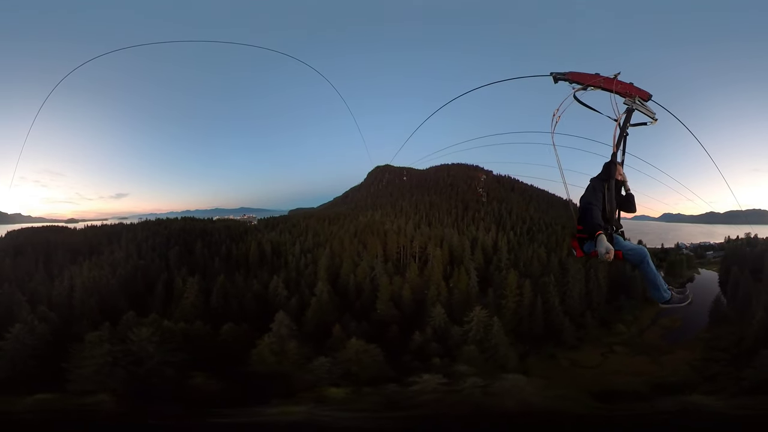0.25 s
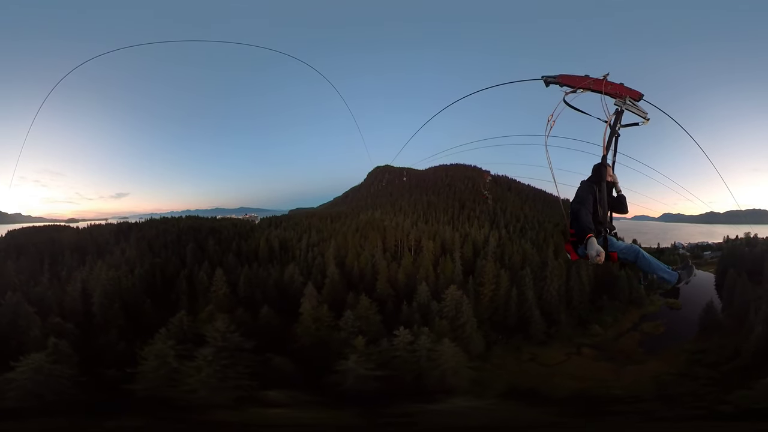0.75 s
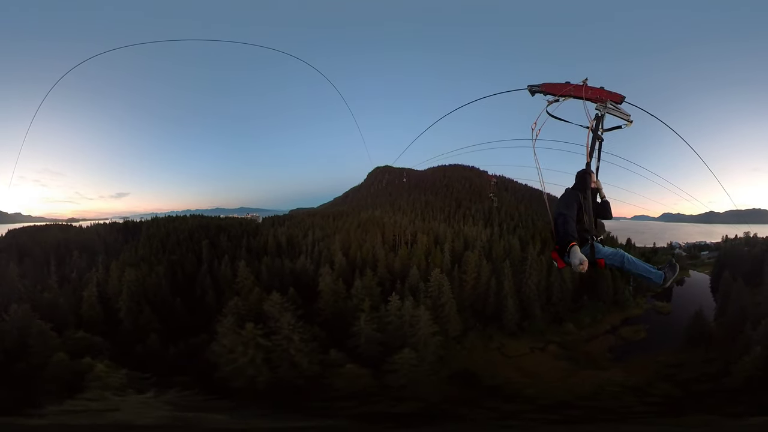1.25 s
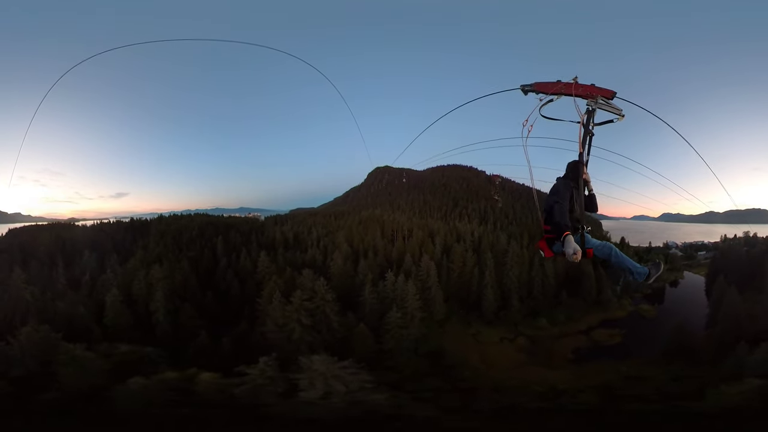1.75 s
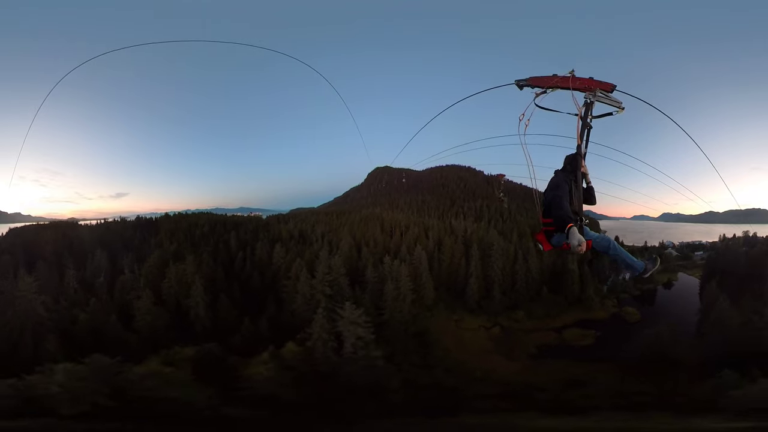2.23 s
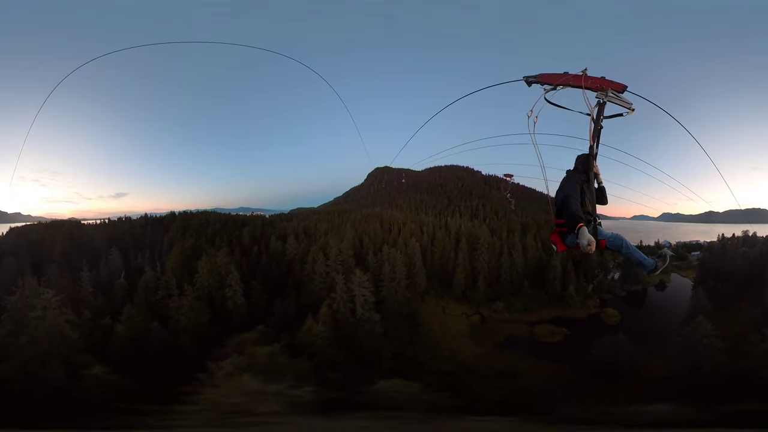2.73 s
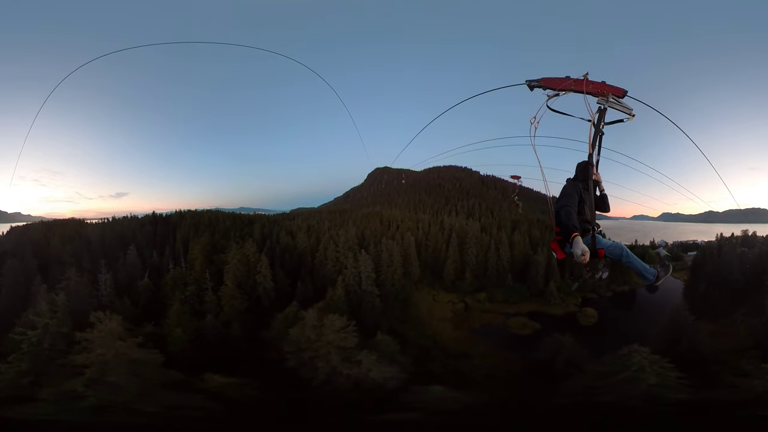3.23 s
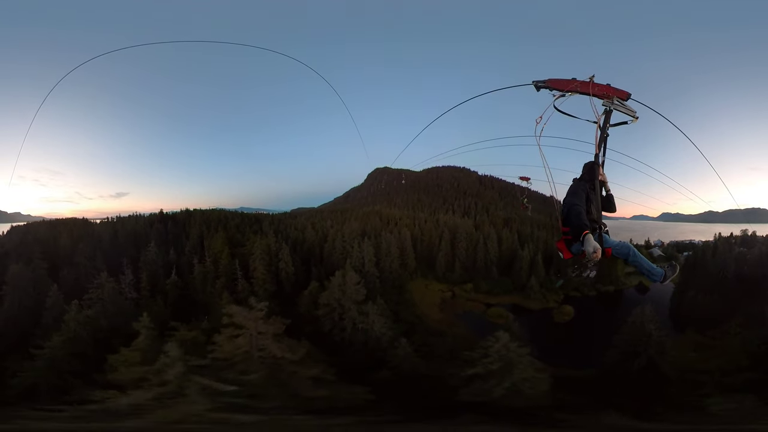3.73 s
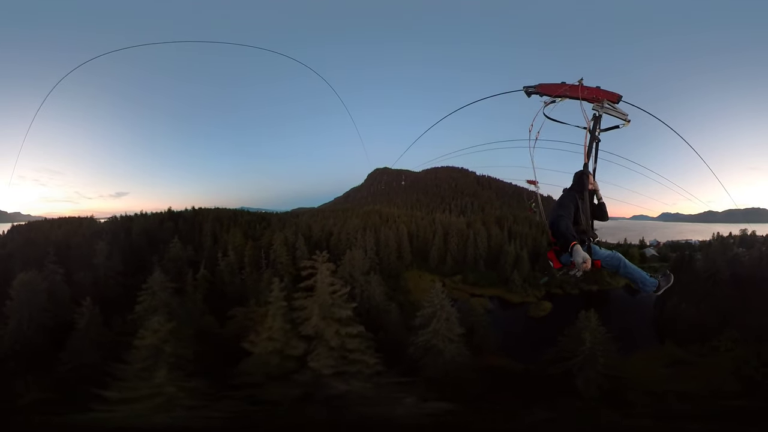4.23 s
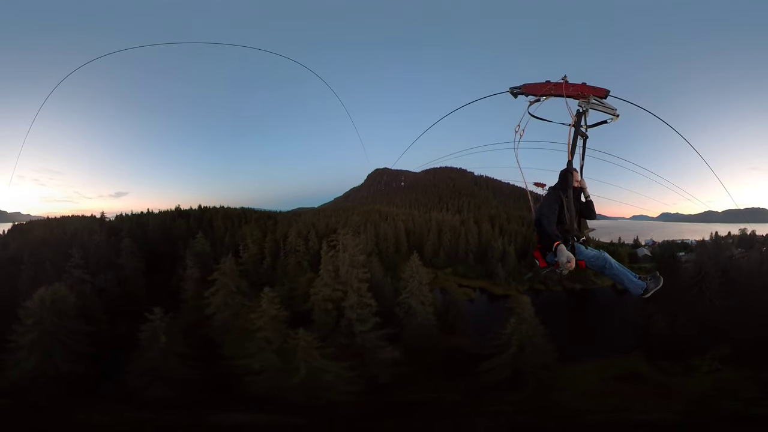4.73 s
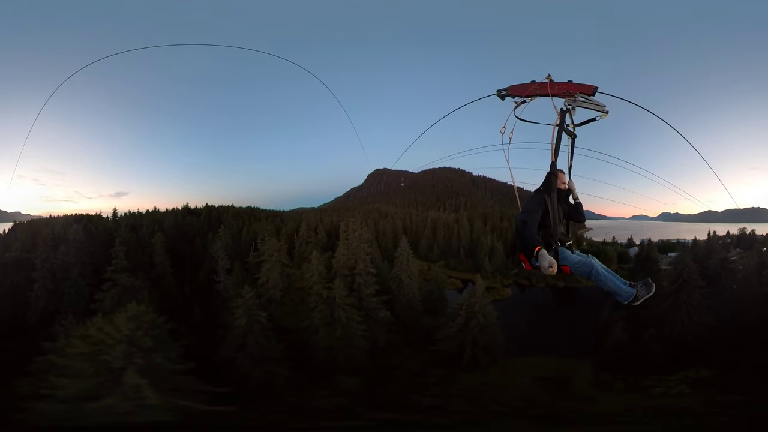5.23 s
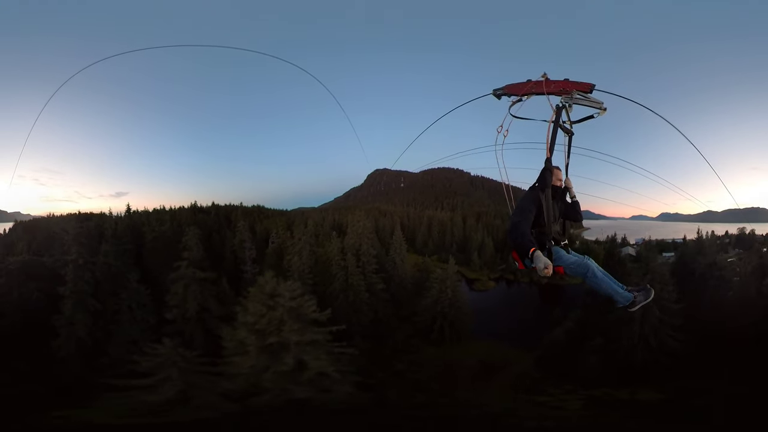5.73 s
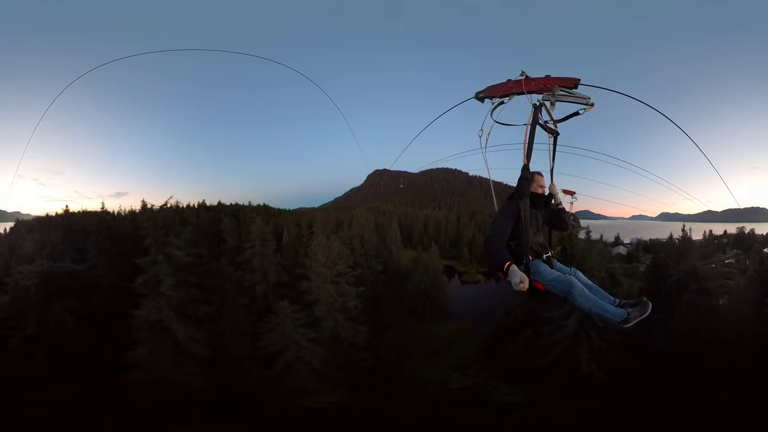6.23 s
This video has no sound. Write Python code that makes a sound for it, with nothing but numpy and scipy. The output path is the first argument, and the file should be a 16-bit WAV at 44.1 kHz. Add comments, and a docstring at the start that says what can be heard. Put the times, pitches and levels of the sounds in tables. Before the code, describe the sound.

Heavy, low wind buffets the microphone on a fast cable ride, with a wavering hollow hum and a faint pulley whine overhead.

```python
"""Over a forest, on a zip line, heard from a camera held out on a pole.
Vortices shed by the pole sing a wavering aeolian tone; shaped noise buffets, rushes and hisses at the microphone.
Gusts roar, thump and whistle as gliding bands of noise; slaps and jets of air strike the port.
Overhead the pulleys whine in three partials, sinking as the ride slows, and noise rings the trolley frame;
a wheel squeals thinly and the rigging ticks."""
import sys
import numpy as np
from scipy import signal
from scipy.fft import rfft, irfft
from scipy.io import wavfile
from scipy.ndimage import uniform_filter1d

SR = 44100
rng = np.random.default_rng(int(sys.argv[2]) if len(sys.argv) > 2 else 0)


def persist_wave(psi):
    """Save psi, clipped to +-1, as 16-bit WAV."""
    counts = np.round(np.clip(psi, -1, 1) * 32767).astype(np.int16)
    wavfile.write(sys.argv[1], SR, np.atleast_2d(counts).T)


N = 285768
TIME = np.arange(N) / SR  # s
EDGE_HZ = 7300  # upper band limit
WHINE_HZ, SAG_HZ_PER_S, SAG_HZ_PER_S2 = 1195, 2.3, 1.62  # start pitch and its ever faster fall

# Relative levels are trimmed where used. Times are event centres unless marked as start.
# vortex shedding rate of the pole, set by airspeed: (time [s], mean pitch [Hz])
POLE_PITCH = [(0, 390.4), (.2, 392), (.29, 402.7), (.4, 373.3), (.5, 396), (.68, 384), (.83, 389.2),
              (.96, 373.4), (1.3, 368.4), (1.42, 373), (1.6, 365.8), (2.05, 359.8), (2.23, 366.3),
              (2.5, 357.3), (2.88, 349.4), (2.96, 358.8), (3.1, 349.7), (3.17, 366), (3.25, 351.8),
              (3.38, 373.7), (3.48, 352), (3.73, 375.3), (4.1, 361), (4.21, 393.8), (4.33, 370),
              (4.58, 388.8), (4.75, 382.7), (4.87, 391.4), (4.97, 383.3), (5.22, 399.2), (5.4, 387.7),
              (5.55, 382), (5.82, 356.5), (6.13, 358.3), (6.23, 397.5), (6.31, 413.8), (6.39, 388),
              (6.48, 415)]
# regularity of the shedding: (time [s], relative tone level [dB])
POLE_LEVEL = [(0, -28), (.28, -25.5), (.4, -25), (.5, -27), (.62, -27), (.95, -23), (1.3, -25), (1.6, -27),
              (1.9, -23.5), (2.25, -22), (2.62, -21), (2.9, -25), (3.5, -24), (3.87, -24), (4.1, -22),
              (4.4, -27.5), (4.57, -27), (4.7, -26.5), (5, -25), (5.23, -20.5), (5.55, -22.5),
              (5.68, -36.5), (6.18, -29.5), (6.3, -16.5), (6.42, -30.5)]
# shedding locks in, tone flares: (time [s], length [s], rise [dB])
POLE_FLARES = [(.29, 0.027, 5.5), (.507, 0.025, 15), (3.872, .04, 6), (4.575, .05, 7.5), (5.756, .025, 14)]
# shedding breaks down, tone drops out: (time [s], length [s], depth [dB])
POLE_BREAKS = [(.18, 0.053, 19), (.57, 0.05, 22.5), (.66, 0.049, 6.5), (.74, 0.068, 12), (.87, 0.043, 20),
               (1.03, 0.056, 2.5), (1.51, 0.051, 4), (1.93, 0.13, 6), (2.16, 0.098, 7), (2.44, 0.043, 6),
               (2.77, 0.18, 14.5), (3.12, 0.072, 9), (3.49, 0.036, 7), (3.9, 0.037, 12), (4.27, 0.11, 19),
               (4.355, 0.04, 20), (4.61, .04, 15), (4.92, 0.053, 10), (5.37, 0.14, 10), (5.46, .04, 18),
               (6.0, 0.064, 13), (6.24, .03, 11), (6.37, .04, 10)]
# hollow ring of the pole, stirred by airflow: (time [s], level [dB])
POLE_HOLLOW = [(0, -26), (.68, -37.5), (1.6, -27), (2.85, -34.5), (3.7, -32), (4.2, -29.5), (4.29, -35),
               (4.6, -31), (5.3, -32.5), (6, -34.5), (6.4, -30)]
# smooth air, less buffeting, stronger pole tone: (time [s], length [s], depth [dB])
CALMS = [(0.926, 0.1, 9), (1.23, 0.084, 4), (1.655, 0.062, 7), (1.83, .07, 12), (2.2, 0.13, 6.5),
         (3.195, 0.031, 23), (3.778, 0.097, 17), (4.308, 0.14, 17), (5.35, 0.12, 7.5), (5.52, 0.086, 0.5),
         (6.311, .09, 4)]
# buffeting at the microphone: (time [s], relative level [dB])
BUFFET = [(0, -25.5), (.5, -28.5), (.95, -26), (1.25, -24.5), (1.75, -26.5), (2.45, -29.5), (2.9, -25),
          (3.65, -23.5), (3.95, -25), (4.45, -22.5), (5.3, -25), (5.8, -22), (6.48, -23)]
# buffeting spectrum: (frequency [Hz], relative density [dB])
BUFFET_COLOUR = [(10, -40), (25, -23.5), (38, -6.5), (52, -0.5), (90, -0.5), (130, -1.5), (200, -3.5),
                 (300, -10.5), (420, -13.5), (700, -27.5), (1500, -61)]
# airstream round the housing: (time [s], relative level [dB])
RUSH = [(0, -29), (.42, -28), (.8, -35.5), (1.08, -34.5), (1.28, -40), (1.42, -38.5), (1.75, -39.5),
        (2.82, -35), (3.05, -40), (3.55, -41), (3.86, -32.5), (4.02, -37.5), (4.19, -28.5), (4.235, -25.5),
        (4.258, -43), (4.3, -33.5), (4.35, -39), (4.4, -41), (4.7, -41.5), (5.3, -44.5), (5.42, -41.5),
        (6.12, -42.5), (6.48, -47.5)]
# rush spectrum: (frequency [Hz], relative density [dB])
RUSH_COLOUR = [(100, -14.5), (280, 8), (480, 1.5), (650, -1.5), (900, -7.5), (1200, -15.5), (1600, -24.5),
               (2200, -37), (3500, -47)]
# flurries that ruffle the rush: (time [s], length [s], level change [dB])
FLURRIES = [(.41, 0.024, 3.5), (1.028, .025, 5.5), (2.82, .06, 3.5), (3.52, .05, 3), (4.17, .035, 4.5),
            (4.38, 0.027, 8), (4.43, 0.054, 2.5), (4.645, .06, 5.5), (4.788, 0.031, 4.5), (4.86, .03, 0),
            (4.97, .08, 3.5), (5.235, 0.027, -0.5), (5.43, 0.098, 1), (5.6, 0.057, 1), (5.78, 0.023, 8.5),
            (6.09, 0.037, 9.5), (6.15, 0.038, 9), (6.385, 0.049, 1)]
# fine turbulence at the port: (time [s], relative level [dB])
HISS = [(0, -62), (.58, -63), (.835, -64), (1.15, -66.5), (1.8, -63), (2.8, -61), (2.98, -65.5),
        (3.2, -62.5), (3.95, -63), (4.15, -60.5), (4.25, -66.5), (5.27, -67.5), (5.4, -63), (5.56, -65.5),
        (5.72, -63), (5.87, -67), (6.03, -60), (6.22, -64.5), (6.48, -69)]
# hiss spectrum: (frequency [Hz], relative density [dB])
HISS_COLOUR = [(500, -11.5), (1200, 11.5), (1800, 12), (2300, 4.5), (3000, -0.5), (4000, -4), (5050, -6.5),
               (5600, -14), (6500, -26), (7400, -31)]
# hollows of the housing that colour the hiss: (centre [Hz], width [Hz], lift [dB])
HOUSING_HOLLOWS = [(2600, 130, 0), (3540, 140, 2), (4140, 170, 2.5), (4830, 170, 2.5)]
# roar over the housing, sliding as the camera swings: (time [s], centre [Hz], relative level [dB])
ROAR = [(0, 930, -38.5), (.3, 980, -38), (.55, 1100, -38.5), (.65, 1101, -42), (.72, 1253, -51.5),
        (.82, 1300, -48.5), (.87, 1320, -41.5), (.94, 1238, -40.5), (1.03, 1230, -43.5),
        (1.09, 1020, -43.5), (1.15, 800, -40), (1.24, 801.4, -61.5), (3.55, 1350, -63.5),
        (3.76, 1253, -43.5), (3.88, 1200, -44), (4.0, 1223, -37), (4.12, 1250, -38), (4.18, 1080, -38.5),
        (4.225, 920, -42), (4.25, 1350, -64), (4.28, 1430, -44.5), (4.36, 1180, -47), (4.5, 1204, -71)]
# large eddies striking the microphone: (time [s], length [s], level [dB], centre [Hz])
THUMPS = [(0.067, 0.14, -30, 200), (.22, .14, -27, 190), (.615, 0.064, -22, 109.2), (0.672, 0.061, -18, 72),
          (0.759, 0.1, -22, 87.3), (1.12, 0.11, -22, 179.3), (1.391, 0.046, -21.5, 118.7),
          (1.77, .05, -27, 168.3), (1.86, .06, -23, 100.8), (2.353, 0.054, -26.5, 70),
          (2.792, 0.12, -23, 200), (2.88, 0.17, -21.5, 60), (3.058, 0.069, -23.5, 102),
          (3.362, 0.0474, -31, 111.1), (4.171, 0.053, -19, 223.1), (4.648, .05, -22.5, 127),
          (5.06, 0.075, -25.5, 90), (5.441, 0.072, -24, 110), (6.0, .1, -23.5, 190.1),
          (6.149, 0.13, -25, 90)]
# gusts on the housing edges:
# (time [s], length [s], relative level [dB], first pitch [Hz], last pitch [Hz], width [Hz])
WHISTLES = [(0.068, 0.19, -39, 1183, 915, 45), (0.168, 0.17, -38, 714, 662, 79),
            (0.334, 0.16, -39.5, 990, 1168, 70), (0.421, 0.18, -46, 1170, 1036, 60),
            (0.476, 0.31, -50.5, 1310, 1260, 120.6), (.55, 0.17, -40, 1189, 991, 90),
            (1.476, 0.16, -38.5, 790, 742, 180), (1.799, 0.13, -49, 1580, 1627, 69.7),
            (2.218, 0.17, -49, 1803, 1748, 45), (2.309, 0.08, -48, 1750, 1906, 44.6),
            (2.922, 0.12, -41.5, 1250, 1297, 90), (3.091, 0.036, -51, 1388, 1360, 50.5),
            (3.187, 0.084, -41.5, 1294, 1354, 44.8), (3.435, .07, -47, 1295, 1343, 69.8),
            (3.837, 0.16, -39, 1313, 1106, 70), (4.173, 0.079, -35, 1066, 1020, 45),
            (4.29, 0.056, -49, 1490, 1385, 68.5)]
# tight vortices crossing the port, sudden pressure dips: (time [s], peak [dB], centre [Hz])
SLAPS = [(2.082, -7.5, 129), (4.239, -6.5, 65), (4.628, -10, 132), (5.597, -10, 130), (5.776, -17.5, 75),
         (5.8, -12, 64.1), (6.254, -14, 168), (6.414, -9.5, 84.9)]
# air straight into the port: (start [s], length [s], level [dB])
JETS = [(0.599, 0.227, -52), (0.636, 0.037, -48.5), (4.154, 0.027, -56)]
# jet spectrum: (frequency [Hz], relative density [dB])
JET_COLOUR = [(900, -4.5), (1800, 13), (2400, 5), (3400, 0), (5000, -3), (5600, -15), (6500, -24.5),
              (7400, -26.5)]
# pulley whine: (time [s], first partial level [dB], octave level [dB])
WHINE = [(0, -56.5, -77.5), (.7, -49.5, -67.5), (1.2, -55.5, -80.5), (1.75, -49.5, -68), (2.7, -48.5, -65),
         (3.3, -51, -74.5), (4.9, -57, -71.5), (5.55, -52, -68.5), (6.15, -44.5, -66.5), (6.48, -53, -80)]
# ring of the trolley frame: (frequency [Hz], width [Hz], relative level [dB])
FRAME_MODES = [(159.9, 33, 2), (1785, 160, -22.5), (1892, 32, -29), (2950, 170, -45.5), (3610, 160, -51),
               (3960, 280, -50), (4880, 200, -51.5), (6660, 110, -59)]
# shaking of the trolley by the cable: (time [s], relative level [dB])
ROLLING = [(0, -37), (1.4, -37.5), (2.3, -28.5), (3.2, -36.5), (6.48, -43.5)]
# wandering wheel squeal: (time [s], mean pitch [Hz], level [dB], relative side-strand level [dB])
SQUEAL = [(1.1, 3300, -87, -7.5), (1.25, 3200, -77, -10), (1.38, 2885, -73.5, -6.5),
          (1.43, 3130, -75.5, -10), (1.55, 2770, -80, -7.5), (1.8, 2737, -88.5, -12.5),
          (1.94, 2599, -72, -12), (2.0, 2586, -68, -12), (2.04, 2478, -65, -14), (2.09, 2845, -69, -12.5),
          (2.16, 2910, -68, -13), (2.23, 2530, -71, -9), (2.38, 2650, -74.5, -7), (2.48, 3025, -71, -7.5),
          (2.56, 3250, -71, -4), (2.67, 3360, -70, -5.5), (2.745, 3690, -72, -3.5), (2.9, 3890, -78, -3)]
# faint rigging ticks: (time [s], peak [dB])
TICKS = [(1.22, -53), (3.851, -63), (4.172, -49), (4.852, -54)]


def pole(rough_db, tone_db=-0.5, upset=0.3, wander_hz=5.5, flutter_db=1.73, bead_db=2.0,
         fray_db=-23.5, fray_share=0.45, fray_width_hz=55, hollow_hz=421, hollow_width_hz=28):
    """Vortices shed at a rate set by airspeed; rough air weakens the beaded, frayed tone; the tube rings above."""
    (hz,), (level_db,), (hollow_db,) = curves(POLE_PITCH), curves(POLE_LEVEL), curves(POLE_HOLLOW)
    turns = np.cumsum(hz + wander_hz * drift(rate_hz=54.7)) / SR
    beads_db = flutter_db * drift(rate_hz=20) - bead_db * (drift(rate_hz=30) ** 2 - 1)
    level_db = tone_db + level_db + bumps(POLE_FLARES) - bumps(POLE_BREAKS) - upset * rough_db
    tone = sine(turns) * gain_of(level_db + beads_db)
    # the fray follows only part of the tone's level
    fray = gain_of(fray_db + fray_share * level_db) * ring(hz, fray_width_hz)
    hollow = gain_of(hollow_db) * ring(hollow_hz, hollow_width_hz)
    return tone + fray + hollow


def airstream(rough_db, eddies, buffet_db=-1, rush_db=3.5, hiss_db=6.5,
              buffet_lump_db=1.5, rush_lump_db=1.23, hiss_lump_db=0.93,
              rush_share=0.17, hiss_share=0.17, bright_hz=800, brighten_db_per_s=0.24):
    """Buffeting, a slowly brightening rush and a thin hiss swell in rough air and share small eddies."""
    air = patchy(turbulence(RUSH_COLOUR), patchy_db=1.44, patch_hz=160, patch_s=0.053)
    body = signal.sosfiltfilt(signal.butter(2, bright_hz, fs=SR, output="sos"), air)
    air = body + (air - body) * gain_of(brighten_db_per_s * (TIME - TIME.mean()))
    fizz = patchy(turbulence(HISS_COLOUR), patchy_db=2.5, patch_hz=260, patch_s=0.071,
                  hollows=HOUSING_HOLLOWS)

    buffet_db = buffet_db + curves(BUFFET)[0] + rough_db + buffet_lump_db * eddies
    rush_db = rush_db + curves(RUSH)[0] + bumps(FLURRIES) + rush_share * rough_db + rush_lump_db * eddies
    hiss_db = hiss_db + curves(HISS)[0] + hiss_share * rough_db + hiss_lump_db * eddies
    buffet = turbulence(BUFFET_COLOUR) * gain_of(buffet_db)
    return buffet + air * gain_of(rush_db) + fizz * gain_of(hiss_db)


def gusts(eddies, thump_spread=0.63, waver=0.016, core_db=-2.5, skirt_db=-8.5, skirt_width_hz=520,
          whistle_lump_db=1.2):
    """Large eddies thump on the microphone; others whistle over edges, a sliding pitch in a rough skirt."""
    out = np.zeros(N)
    sway = 1 + waver * drift(rate_hz=49)
    for s, length_s, db, first_hz, last_hz, width_hz in WHISTLES:
        size = int(length_s * SR)
        hz = np.linspace(first_hz, last_hz, size) * sway[int(s * SR):][:size]
        core = gain_of(db + core_db) * ring(hz, width_hz, size=size)
        skirt = gain_of(db + skirt_db) * ring(hz, skirt_width_hz, size=size)
        add(out, s, core + skirt)
    out = out * gain_of(whistle_lump_db * eddies)
    for s, length_s, db, hz in THUMPS:
        settled = ring(hz, thump_spread * hz, size=SR)[-int(length_s * SR):]
        add(out, s, gain_of(db) * evened(settled))
    return out


def slaps():
    """A tight vortex sucks at the microphone once, between two gentler pushes."""
    out = np.zeros(N)
    for s, db, hz in SLAPS:
        u = np.pi * hz * (TIME - s)
        out -= gain_of(db) * (1 - 2 * u ** 2) * np.exp(-u ** 2)
    return out


def roar(eddies, half_width_hz=265, lump_db=0.4):
    """Air tears over the housing: one broad, grainy noise band, shifted to a sliding centre."""
    hz, db = curves(ROAR)
    stir = rng.standard_normal(N) + 1j * rng.standard_normal(N)
    sway = signal.sosfilt(signal.butter(2, half_width_hz, fs=SR, output="sos"), stir)
    band = evened((sway * np.exp(2j * np.pi * np.cumsum(hz) / SR)).real)
    band = patchy(band, patchy_db=2.0, patch_hz=110, patch_s=0.04)
    return band * gain_of(db + lump_db * eddies)


def jets(attack_s=0.014, release_s=0.008):
    """Air blows squarely into the port: dense hiss with a short attack and quick cutoff."""
    out = np.zeros(N)
    for s, length_s, db in JETS:
        rise, fall = (TIME - s) / attack_s, (s + length_s - TIME) / release_s
        opening = np.clip(np.minimum(rise, fall), 0, 1)
        out += gain_of(db) * opening * turbulence(JET_COLOUR)
    return out


def trolley(wobble=0.0014, shimmer_db=1.8, third_db=-13):
    """Cable strands tick past the pulleys fast enough to whine, and shake the frame."""
    hz = WHINE_HZ - SAG_HZ_PER_S * TIME - SAG_HZ_PER_S2 * TIME ** 2
    turns = np.cumsum(hz * (1 + wobble * drift(rate_hz=25))) / SR
    first_db, octave_db = curves(WHINE)
    whine = np.zeros(N)
    for k, db in enumerate([first_db, octave_db, octave_db + third_db], 1):
        whine += sine(k * turns) * gain_of(db + shimmer_db * drift(rate_hz=26))
    frame = sum(gain_of(db) * ring(mode_hz, width_hz) for mode_hz, width_hz, db in FRAME_MODES)
    return whine + gain_of(curves(ROLLING)[0]) * frame


def squeal(wander=0.016, catch_db=3.0, strand_gap=0.095, strand_width_hz=110, stagger=0.026,
           strands_db=-1.5):
    """A rubbing wheel catches and lets go; its staggering pitch is flanked by noisy strands."""
    hz, db, side_db = curves(SQUEAL)
    rubbing = (TIME > SQUEAL[0][0]) & (TIME < SQUEAL[-1][0])
    hz = hz * (1 + stagger * gain_of(side_db) * drift(rate_hz=70))
    turns = np.cumsum(hz * (1 + wander * gain_of(side_db) * drift(rate_hz=160))) / SR
    strands = np.zeros(N)
    for k in (-1, 1, 2):  # one strand below, two above
        strand = ring(hz * (1 + k * strand_gap), strand_width_hz)
        strands += strand * gain_of(catch_db * drift(rate_hz=15)) / abs(k)
    tone = sine(turns) + gain_of(strands_db + side_db) * strands
    return rubbing * gain_of(db + catch_db * drift(rate_hz=45)) * tone


def rigging(tick_hz=4200, length_s=0.00039):
    """Hardware shifts under load: tiny dry sine bursts."""
    out, t = np.zeros(N), np.arange(int(length_s * SR)) / SR
    for s, db in TICKS:
        add(out, s, gain_of(db) * np.sin(2 * np.pi * tick_hz * t))
    return out


def stirring(rate_hz=20, gust_db=2.2):
    """Air roughness over time in dB: chance eddies, broken by spells of calm."""
    return gust_db * drift(rate_hz=rate_hz) - bumps(CALMS)


def gain_of(db):
    """Decibels to amplitude."""
    return 10 ** (np.asarray(db) / 20)


def evened(x):
    """Scales to an rms of one."""
    return x / np.sqrt(np.mean(x ** 2) + 1e-20)


def sine(turns):
    """Sine of rms one from a phase in turns."""
    return np.sqrt(2) * np.sin(2 * np.pi * turns)


def curves(rows):
    """Table columns joined by straight lines in time."""
    s, *columns = np.transpose(rows)
    return [np.interp(TIME, s, c) for c in columns]


def drift(rate_hz):
    """Smooth noise of rms one, with a Gaussian rolloff set by the rate."""
    hz = np.fft.rfftfreq(N, 1 / SR)
    gain = np.exp(-(hz / rate_hz) ** 2) * (hz > 0)
    return evened(irfft(rfft(rng.standard_normal(N)) * gain, N))


def turbulence(colour):
    """Noise of rms one with the given spectrum."""
    hz = np.fft.rfftfreq(N, 1 / SR)
    points_hz, db = np.transpose(colour)
    gain = gain_of(np.interp(np.log(hz + 1), np.log(points_hz), db, right=-120))
    return evened(irfft(rfft(rng.standard_normal(N)) * gain, N))


def ring(hz, width_hz, size=N):
    """A steep resonance (double pole) of rms one, stirred by noise; its centre may glide."""
    r = np.exp(-np.pi * abs(width_hz) / SR)
    stir = rng.standard_normal(size) + 1j * rng.standard_normal(size)
    sway = signal.lfilter([(1 - r) ** 2], [1, -2 * r, r * r], stir)
    return evened((sway * np.exp(2j * np.pi * np.cumsum(hz * np.ones(size)) / SR)).real)


def add(mix, s, sound):
    """Mixes in a sound under a half-sine envelope, centred on the given time."""
    at = round(s * SR) - len(sound) // 2 + np.arange(len(sound))
    inside = (at >= 0) & (at < N)
    swell = np.sin(np.linspace(0, np.pi, len(sound)))
    mix[at[inside]] += (sound * swell)[inside]


def bumps(rows):
    """Short, rounded level changes in dB over time."""
    out = np.zeros(N)
    for s, length_s, size_db in rows:
        add(out, s, np.full(int(length_s * SR), size_db))
    return out


def patchy(x, patchy_db, patch_hz, patch_s, hollows=()):
    """Passing eddies lift some pitches and starve others; fixed hollows add their colour."""
    hz, s, z = signal.stft(x, SR, nperseg=1024, noverlap=768)
    # blur white noise across frequency and along time
    across, along = np.fft.fftfreq(len(hz), hz[1])[:, None], np.fft.fftfreq(len(s), s[1])
    blur = np.exp(-(across * patch_hz) ** 2 - (along * patch_s) ** 2)
    patches = np.fft.ifft2(np.fft.fft2(rng.standard_normal(z.shape)) * blur).real
    db = patchy_db * evened(patches)
    for centre_hz, width_hz, lift_db in hollows:
        db = db + lift_db * np.exp(-(2 * (hz[:, None] - centre_hz) / width_hz) ** 2)
    return evened(signal.istft(z * gain_of(db), SR, nperseg=1024, noverlap=768)[1][:N])


def scene():
    """Everything that reaches the one microphone."""
    rough_db, eddies = stirring(), drift(rate_hz=160)
    wind = airstream(rough_db, eddies) + gusts(eddies) + slaps() + roar(eddies) + jets()
    return (pole(rough_db) + wind + trolley() + squeal() + rigging())[None]


def record(dry, threshold_db=-19, squeeze=0.67, makeup_db=0.61):
    """A quick compressor holds down the strongest buffets; a linear-phase lowpass limits the band."""
    power_db = 10 * np.log10(abs(uniform_filter1d(dry[0] ** 2, size=700)) + 1e-12)  # sizes in samples
    over_db = uniform_filter1d(np.maximum(power_db - threshold_db, 0), size=400)
    held = dry * gain_of(makeup_db - squeeze * over_db)
    lowpass = signal.firwin(511, EDGE_HZ, window=("kaiser", 9), fs=SR)
    return signal.oaconvolve(held, lowpass[None], "same")


dry = scene()
out = record(dry)
persist_wave(out)
```